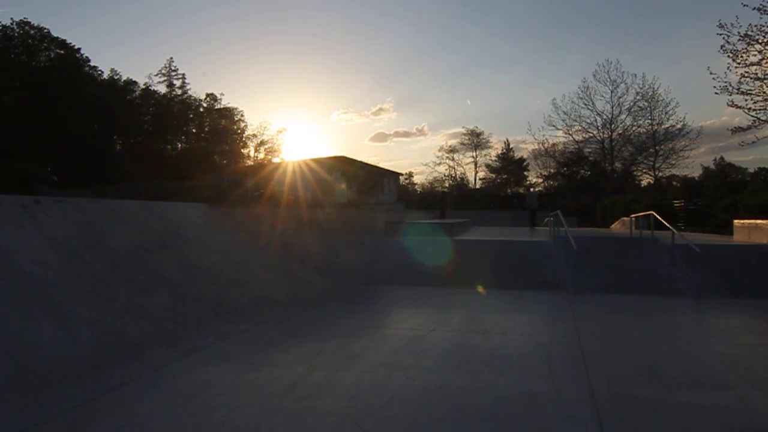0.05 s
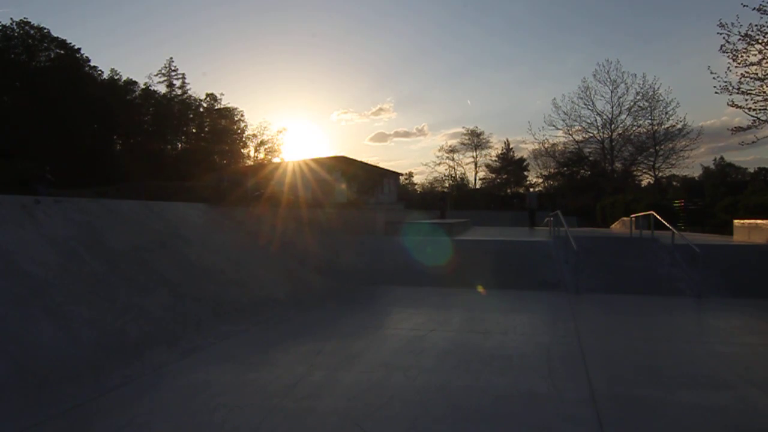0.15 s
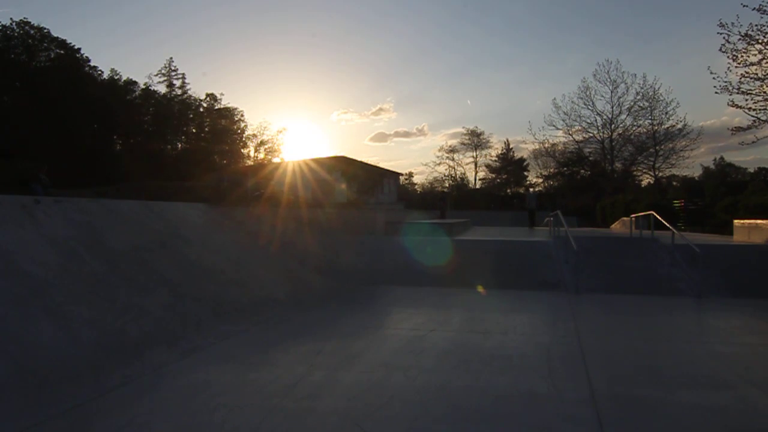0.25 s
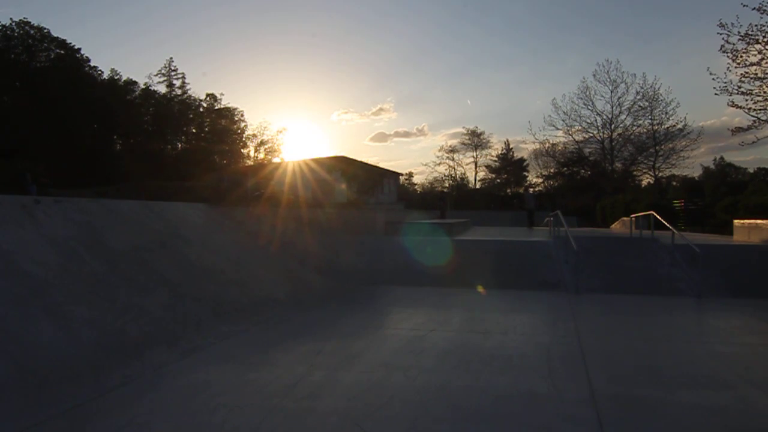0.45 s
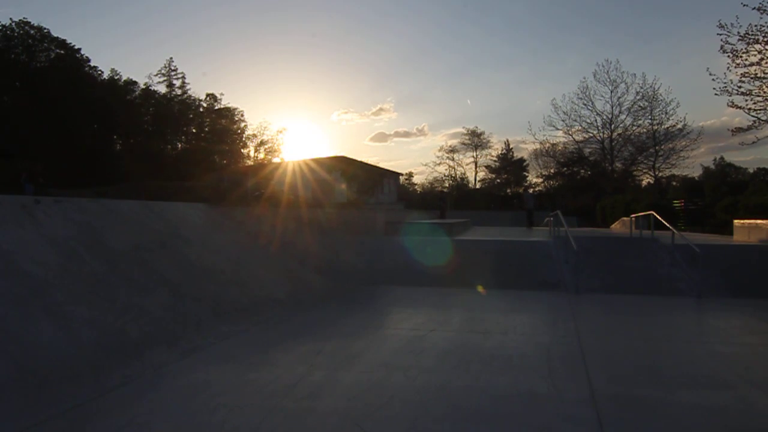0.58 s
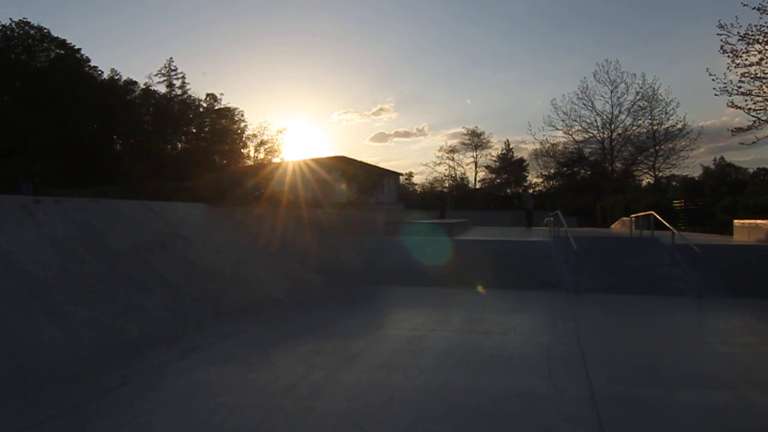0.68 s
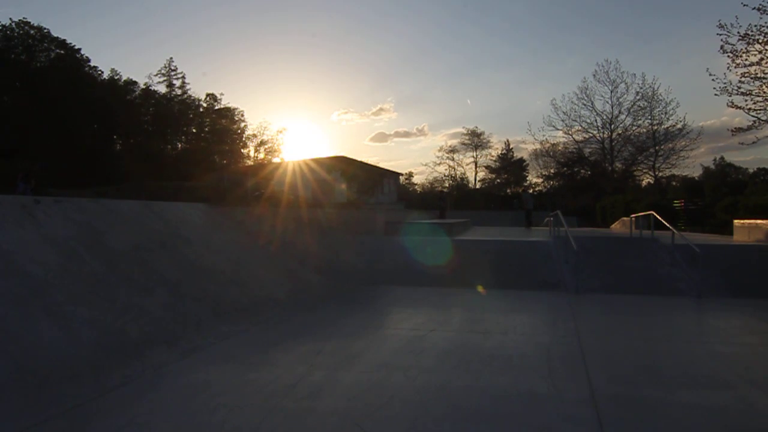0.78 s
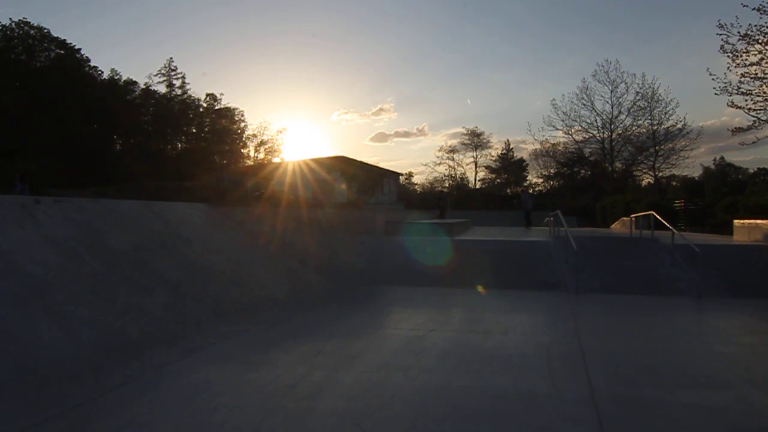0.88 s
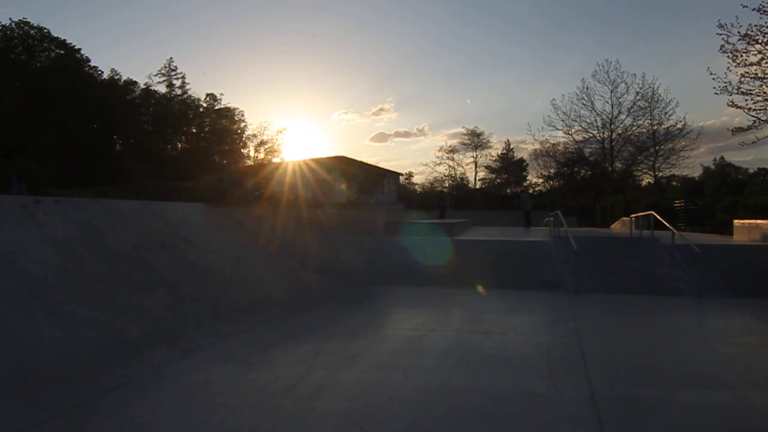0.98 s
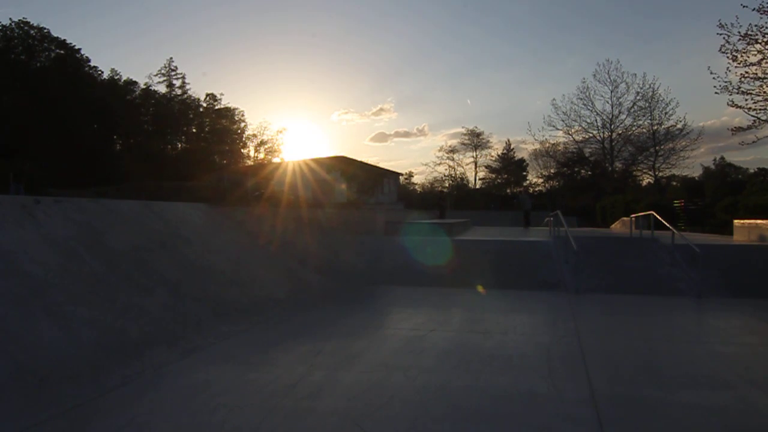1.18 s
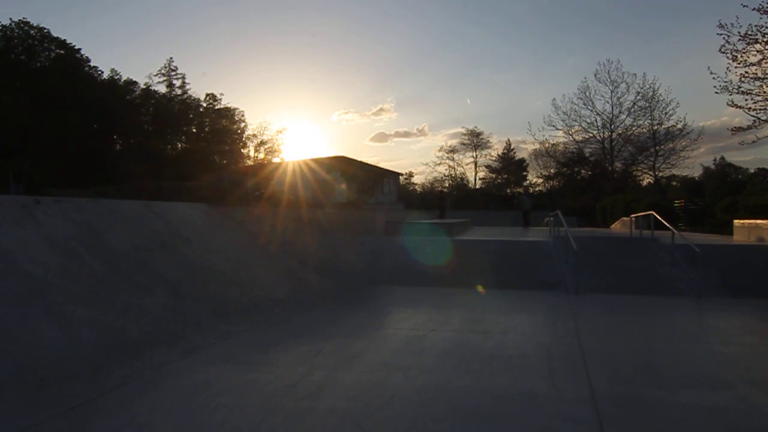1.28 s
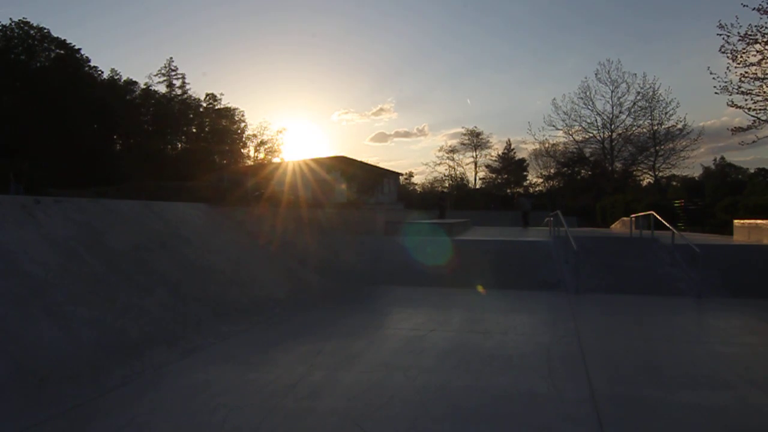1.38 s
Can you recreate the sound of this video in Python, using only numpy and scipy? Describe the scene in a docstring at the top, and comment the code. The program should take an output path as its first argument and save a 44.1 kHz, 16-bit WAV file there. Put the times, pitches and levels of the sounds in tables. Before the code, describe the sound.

A skateboard clack on concrete is the main sound, over steady distant traffic and a flickering hiss. Dull far knocks come around 0.25 seconds, then thin high chirps. At about 0.5 seconds the board lands close by with a gritty, hollow smack, a short echo and a quick rattle that dies by 0.7. Another far knock follows at 0.9, and fainter chirps continue until about 1.4 seconds.

```python
"""A steady wash of distant traffic and a flickering hiss fill an outdoor concrete skatepark at dusk.
Dull knocks come from further off, and thin chirps, birds or squeaking wheels, sound near 4 kHz.
Then a board clacks down close by: hard contacts crunch grit and ring the metal truck, softer pushes
excite the board's hollow thud, and a quick rattle dies away. The concrete scatters a short echo.
An automatic gain control ducks after the clack and slowly recovers."""
import sys
import numpy as np
from scipy import signal
from scipy.fft import rfft, irfft
from scipy.io import wavfile
from scipy.ndimage import uniform_filter1d

SR = 44100
rng = np.random.default_rng(int(sys.argv[2]) if len(sys.argv) > 2 else 0)


def inscribe(sig):
    """Save sig as 16-bit PCM at rate SR to the path in sys.argv[1].

    A 1-D sig is mono; a 2-D sig holds one channel per row.
    Samples are clipped to [-1, 1] before scaling.
    """
    pcm = np.round(np.clip(np.atleast_2d(sig).T, -1, 1) * 32767)
    wavfile.write(sys.argv[1], SR, pcm.astype(np.int16))


N = 63945
T = np.arange(N) / SR
FREQS = np.maximum(np.fft.rfftfreq(2 * N, 1 / SR), 1)


def from_db(db):
    """Amplitude ratio of a level in decibels."""
    return 10 ** (np.asarray(db) / 20)

def rms_one(x):
    """Normalisation to unit rms."""
    return x / np.sqrt(np.mean(x ** 2) + 1e-20)

def envelope(points):
    """Amplitude over time, interpolated in decibels."""
    return from_db(np.interp(T, *np.transpose(points)))

def noise(gains):
    """Spectral shaping of white noise, at unit rms."""
    return rms_one(irfft(rfft(rng.standard_normal(2 * N)) * gains)[:N])

def spectrum(points):
    """Gain per frequency, interpolated on logarithmic axes."""
    hz, db = np.transpose(points)
    return from_db(np.interp(np.log(FREQS), np.log(hz), db))

def hump(hz, octaves):
    """Resonance band, Gaussian in log frequency."""
    return np.exp(-.5 * (np.log2(FREQS / hz) / octaves) ** 2)

def flutter(hz):
    """Random modulator, band-limited to rates below about hz."""
    return noise(1 / (1 + (FREQS / hz) ** 4))

def cut(x, hz, kind="low", order=2):
    """Maximally flat low- or high-pass filter."""
    return signal.sosfilt(signal.butter(order, hz, kind, fs=SR, output="sos"), x + 1e-18)

def dying(start, decay):
    """Exponential decay from a sudden onset."""
    return (T >= start) * np.exp(-np.maximum(T - start, 0) / decay)

def swell(centre, half_width):
    """Gaussian envelope, down to 1/e^2 at half_width from its centre."""
    return np.exp(-2 * ((T - centre) / half_width) ** 2)

def ring(force, modes, ratio=1):
    """Modal superposition: a force drives damped resonators, the k-th weighted by ratio ** k."""
    out = 0
    for k, (hz, db, t60) in enumerate(modes):
        radius, angle = np.exp(-np.log(1000) / (t60 * SR)), 2 * np.pi * hz / SR
        feedback = [1, -2 * radius * np.cos(angle), radius ** 2]
        out += ratio ** k * from_db(db) * signal.lfilter([0, np.sin(angle)], feedback, force + 1e-18)
    return out


# spectrum of the traffic: (frequency [Hz], relative density [dB])
TRAFFIC_SPECTRUM = [(25, -21), (45, -14), (75, -5.5), (105, -3), (155, 2), (280, -2), (550, -4.5),
                    (1000, 0), (1700, -6.5), (2500, -14.5), (5500, -23), (9000, -34.5), (12500, -28),
                    (16000, -47)]
# envelope of the traffic: (time [s], level [dB])
TRAFFIC_ENVELOPE = [(0, -33.5), (.25, -34), (.5, -33.5), (.8, -37), (1.1, -35.5), (1.45, -35)]
# swells of rumble: (centre time [s], half-width [s], level [dB], frequency [Hz])
RUMBLE_SWELLS = [(1.09, 0.035, -40, 61), (1.047, 0.15, -41.5, 156), (1.22, 0.18, -40, 142),
                 (1.42, 0.066, -39.5, 142)]

def traffic():
    """Incoherent summation: distant vehicles merge into noise, with rumble and a faint wavering drone."""
    rumble = sum(from_db(db) * swell(time, half_width) * noise(hump(hz, octaves=.25))
                 for time, half_width, db, hz in RUMBLE_SWELLS)
    drone_hz = 103.1 + 4 * noise(hump(hz=8, octaves=.96))
    drone = np.sqrt(2) * np.sin(2 * np.pi * np.cumsum(drone_hz) / SR)
    wash = envelope(TRAFFIC_ENVELOPE) * noise(spectrum(TRAFFIC_SPECTRUM))
    return wash + from_db(-48.5) * drone + rumble


# spectrum of the hiss: (frequency [Hz], relative density [dB])
HISS_SPECTRUM = [(1500, -11), (3000, -3), (4300, -0.5), (5600, 4.5), (7000, -1), (8500, -1), (10800, -7),
                 (12000, -4.5), (16000, -17)]
# envelope of the hiss: (time [s], level [dB])
HISS_ENVELOPE = [(0, -51), (.27, -49.5), (.32, -43), (.42, -52.5), (.47, -58), (.72, -50.5), (.84, -45.5),
                 (.93, -42), (1.02, -42.5), (1.07, -42.5), (1.2, -44), (1.33, -50.5), (1.45, -55)]

def hiss(band_width_hz=260, flicker_db=2.6):
    """Amplitude modulation: noise bands flicker independently, with a sheen at the chirps' pitch."""
    shape = spectrum(HISS_SPECTRUM)
    bands = 0
    for hz in np.linspace(1500, 15500, 29):
        band = noise(np.exp(-.5 * ((FREQS - hz) / band_width_hz) ** 2))
        bands += np.interp(hz, FREQS, shape) * band * from_db(flicker_db * flutter(hz=22))
    sheen = from_db(-4) * noise(hump(hz=4060, octaves=.1))
    return envelope(HISS_ENVELOPE) * (rms_one(bands) + sheen)


# reflections from the concrete bowl: (frequency [Hz], relative density [dB])
BOWL_SPECTRUM = [(100, -14), (400, -4), (1000, -0.5), (2000, -1.5), (4000, -8), (8000, -9.5), (15000, -7.5)]

def bowl_echo(x, t60=.3):
    """Diffuse reflection from concrete: convolution with a decaying noise tail of unit energy."""
    tail = noise(spectrum(BOWL_SPECTRUM)) * dying(0, t60 / np.log(1000))
    return signal.fftconvolve(x, tail / np.sqrt(np.sum(tail ** 2)))[:N]


# chirps: (centre time [s], half-width [s], level [dB], pitch [Hz], glide [Hz/s], rasp [0-1])
CHIRP_NOTES = [(0.317, 0.032, -37, 4100, -1.5, 0.63), (0.332, 0.011, -30, 4080, 2, 0.71),
               (.363, 0.021, -25.5, 4096, -3000, 0.48), (0.385, 0.018, -25, 3896, 0.5, 0.87),
               (.409, 0.016, -21, 4170, -3000, 0.38), (.432, 0.018, -44, 3990, 3.5, .5),
               (.478, 0.021, -44, 4200, -1.5, 0.3), (0.729, .03, -44, 7200, 4000, 0.86),
               (0.778, 0.065, -46.5, 4280, 1, 0.54), (0.843, 0.013, -36.5, 4050, 3.5, .3),
               (0.894, .022, -34, 4140, 0.5, .6), (.936, 0.022, -30.5, 3943, -2000, 0.68),
               (0.931, 0.017, -33, 3490, 1, .6), (0.997, 0.03, -33, 3855, 1999.5, 0.94),
               (1.09, 0.047, -34, 3955, -2000, .6), (1.109, 0.022, -31.5, 3010, 2001, 0.78),
               (1.174, 0.028, -34, 3755, -3000, 0.8), (1.24, 0.032, -43, 4170, 1998, 0.75),
               (1.304, .02, -44.5, 5600, 0, .9), (1.352, 0.011, -40.5, 7320, 6, .7)]

def chirps(full_rasp_deviation_hz=130, full_rasp_rate_hz=330):
    """Random frequency and amplitude modulation: rasp shakes thin whistles and breaks them into grains."""
    dry = 0
    for time, half_width, db, hz, glide, rasp in CHIRP_NOTES:
        rate = rasp * full_rasp_rate_hz
        pitch = hz + glide * (T - time) + rasp * full_rasp_deviation_hz * flutter(rate)
        carrier = np.exp(2j * np.pi * np.cumsum(pitch) / SR)
        grains = (flutter(rate) + 1j * flutter(rate)) / np.sqrt(2)
        tone = carrier * (np.sqrt(1 - rasp ** 2) + rasp * grains)
        octave = from_db(-18) * (1 - rasp) * tone * carrier
        dry += from_db(db) * swell(time, half_width) * (tone + octave).real
    return dry + from_db(-7) * bowl_echo(dry, t60=.18)


# far knocks: (time [s], level [dB], decay [s], centre frequency [Hz], width [octaves])
FAR_KNOCKS = [(0.2458, -17, 0.0027, 1300, 0.67), (0.2539, -17.5, 0.0029, 1720, 0.31),
              (0.2543, -23, 0.0071, 778, 0.16), (0.268, -40, 0.0022, 1690, 0.48),
              (0.2836, -29, .003, 1800, .3), (.3030, -31.5, 0.014, 1500, 0.98),
              (0.3242, -25, 0.0028, 1420, 0.39), (.9080, -17, 0.0052, 950, 0.072),
              (0.9087, -27, 0.0041, 800, 0.81), (0.907, -30.5, 0.028, 314, 0.035),
              (0.9102, -39, .015, 397, 0.086)]

def far_knocks():
    """Scattering and treble loss over distance blur short bursts of resonant noise."""
    dry = 0
    for time, db, decay, hz, width in FAR_KNOCKS:
        skirt = from_db(-10) * hump(hz, 2 * width)
        dry += from_db(db) * dying(time, decay) * noise(hump(hz, width) + skirt)
    return cut(dry + from_db(-10) * bowl_echo(dry), hz=3600, order=4)


# crunch of grit: (frequency [Hz], relative density [dB])
GRIT_SPECTRUM = [(300, -4), (1000, -0.5), (1600, 1), (2300, 4), (3100, -6.5), (3900, 4), (4600, -1.5),
                 (5300, -1), (7100, -7.5), (7800, -5.5), (10700, -18.5), (11600, 0.5), (15500, -9.5)]
# modes of the metal truck and wheel: (frequency [Hz], level before weighting [dB], T60 [s])
TRUCK_MODES = [(1520, -12, 0.015), (1790, -9, 0.037), (2100, -2, 0.015), (2340, -6, 0.038),
               (3040, -8, 0.018), (3660, 0, 0.015), (3990, 0.5, 0.025), (5380, -3, .01), (6740, 1, .008),
               (9970, -7.5, 0.021), (11200, -16, 0.0093), (12870, -6, 0.0059)]

def contact(time, db, decay, cutoff_hz, rise_s=.00014):
    """Impulse excitation: one hard contact rings the truck while grit crunches."""
    impulse = np.zeros(N)
    impulse[int(time * SR)] = 1
    burst = np.sqrt(2) * (dying(time, decay) - dying(time, rise_s))
    crunch = from_db(-9) * noise(spectrum(GRIT_SPECTRUM)) * burst
    # successive modes alternate in polarity and gain a little weight
    metal = from_db(-21) * ring(impulse, TRUCK_MODES, ratio=-1.043)
    return from_db(db) * cut(crunch + metal, cutoff_hz)

def rattle(start_s=.5958, gap_s=.0159, first_db=-10.5, loss_db=2.5):
    """Dissipation: six evenly spaced contacts, each weaker and duller than the last."""
    ticks = sum(contact(start_s + k * gap_s, first_db - k * loss_db, .0009, cutoff_hz=10000 * .82 ** k)
                for k in range(6))
    return cut(ticks, hz=1800, kind="high")


# soft pushes on the board: (time [s], level [dB], contact duration [s])
BOARD_PUSHES = [(0.5195, -9, 0.0014), (.5280, -3, 0.00283), (.5385, -1, 0.0019), (0.5457, 3.5, 0.00099),
                (0.553, -27, 0.002)]
# low modes of the board: (frequency [Hz], level [dB], T60 [s])
BOARD_MODES = [(153.3, -11, 0.16), (250, -8, 0.054), (386, 2.5, 0.033), (492, -5.5, 0.047),
               (603, -1, 0.018), (740, -8.5, 0.052), (830, -17, 0.03), (1040, -27, .04)]

def board_thud():
    """Forced vibration: smooth pulses drive the board's low modes; longer contact gives less treble."""
    force = 0
    for time, db, duration in BOARD_PUSHES:
        pulse = swell(time + duration / 2, duration / 2)
        force += from_db(db) * pulse / pulse.sum()
    return from_db(-9) * cut(ring(force, BOARD_MODES), hz=162, kind="high", order=3)


# hard contacts of the landing: (time [s], level [dB], crunch decay [s], low-pass cutoff [Hz])
LANDING_CONTACTS = [(.5085, -10, 0.0017, 2000), (.5112, -7.5, 0.00088, 13800),
                    (0.5119, -11.5, 0.0048, 4900), (0.5203, -16, 0.0057, 15000), (.5228, -26, 0.0023, 6000),
                    (.5288, -28.5, 0.0016, 6000), (.5325, -15, 0.0047, 4530), (.5372, -12.5, 0.0045, 3470),
                    (0.5407, 1.5, .0016, 12900), (.5440, -10.5, 0.0037, 5000), (.5482, 0, 0.0013, 4500),
                    (.5505, -1, 0.0011, 15200), (0.5553, -11, 0.0046, 4070), (0.5651, -9, 0.00075, 8000),
                    (.5688, -4, 0.0027, 6960), (.5710, -16, 0.0011, 10000), (.5800, -10.5, 0.0014, 11000)]

def clack():
    """Impact radiation: contacts and thud arrive directly and off the bowl, followed by a dry rattle."""
    direct = sum(contact(*row) for row in LANDING_CONTACTS) + board_thud()
    return direct + from_db(-10) * bowl_echo(direct) + rattle()


def scene():
    """Linear superposition of all sources at one microphone."""
    return (clack() + far_knocks() + chirps() + hiss() + traffic())[None]

def record(dry):
    """Automatic gain control ducks after loud sounds; saturation rounds peaks; a low-pass cuts the top."""
    threshold_db, slope, attack_s, release_db_per_s = -23, .47, .031, 15
    power = np.maximum(uniform_filter1d(dry[0] ** 2, size=441), 1e-12)  # 10 ms mean
    target_db = slope * np.maximum(10 * np.log10(power) - threshold_db, 0)
    held_db = np.maximum.accumulate(target_db + release_db_per_s * T) - release_db_per_s * T
    pole = np.exp(-1 / (attack_s * SR))
    duck_db = signal.lfilter([1 - pole], [1, -pole], held_db)
    rounded = np.tanh(dry * from_db(-duck_db))
    return signal.sosfilt(signal.ellip(10, .2, 80, 15900, fs=SR, output="sos"), rounded)


dry = scene()
out = record(dry)
inscribe(out)
```